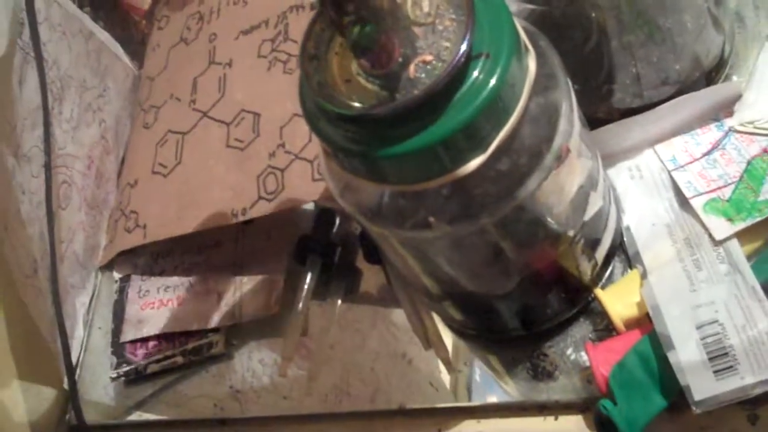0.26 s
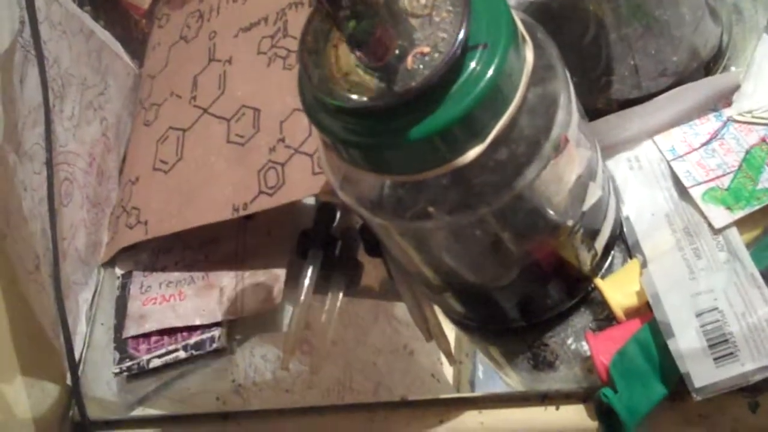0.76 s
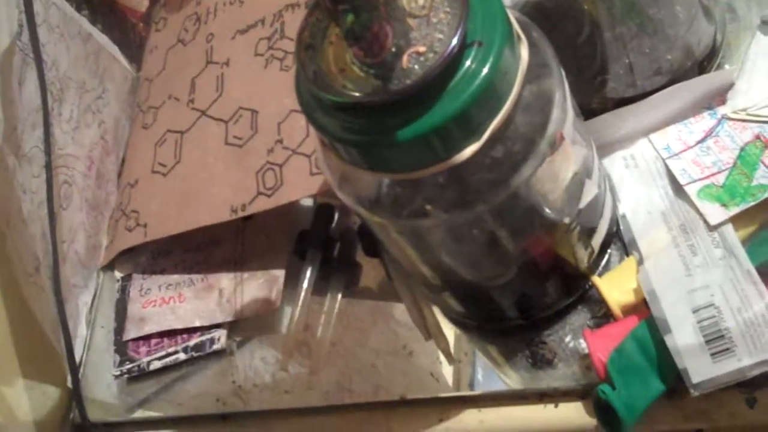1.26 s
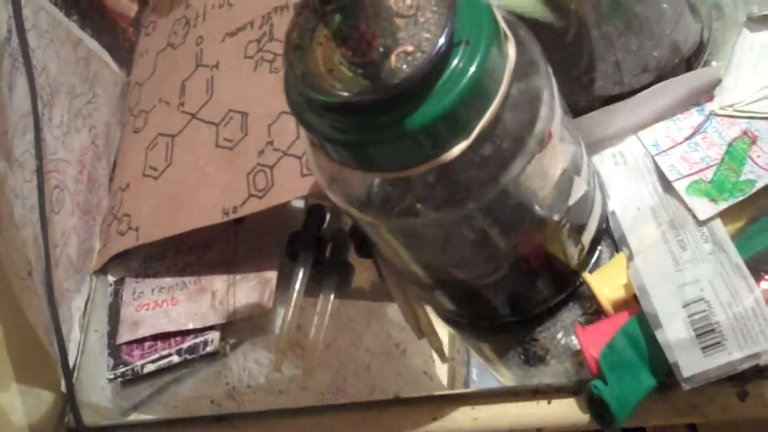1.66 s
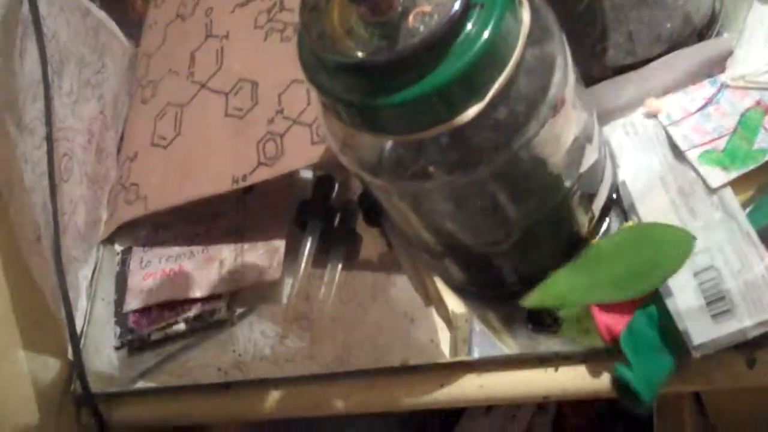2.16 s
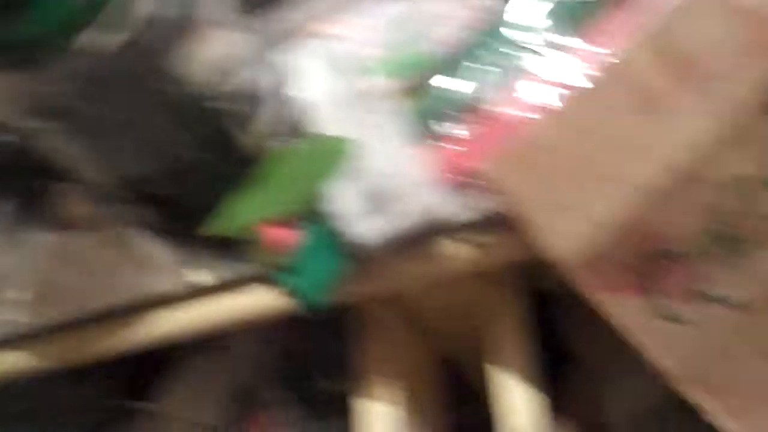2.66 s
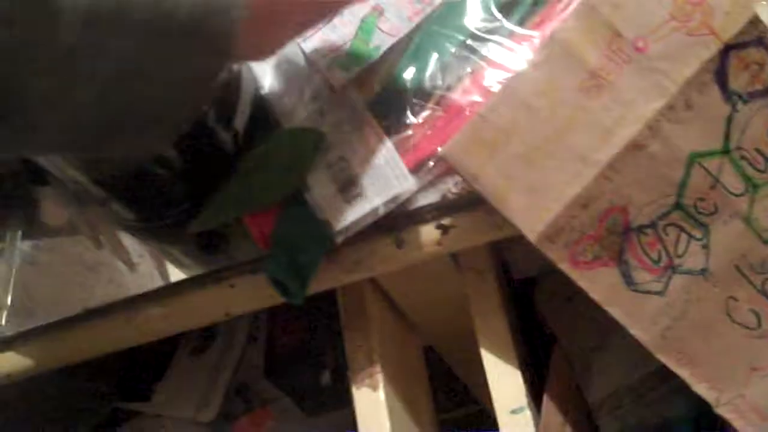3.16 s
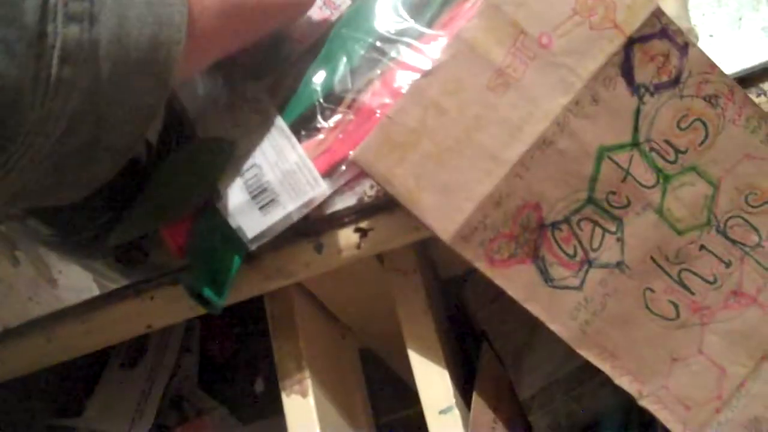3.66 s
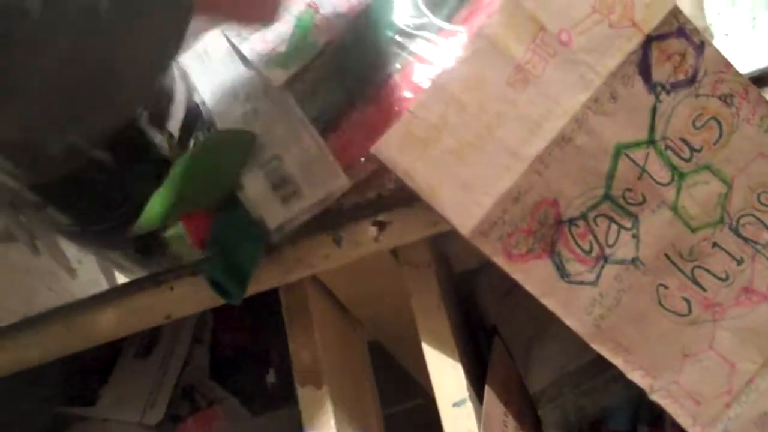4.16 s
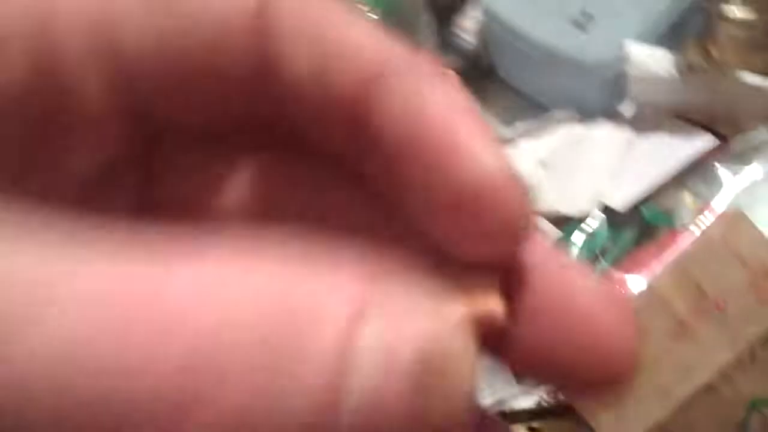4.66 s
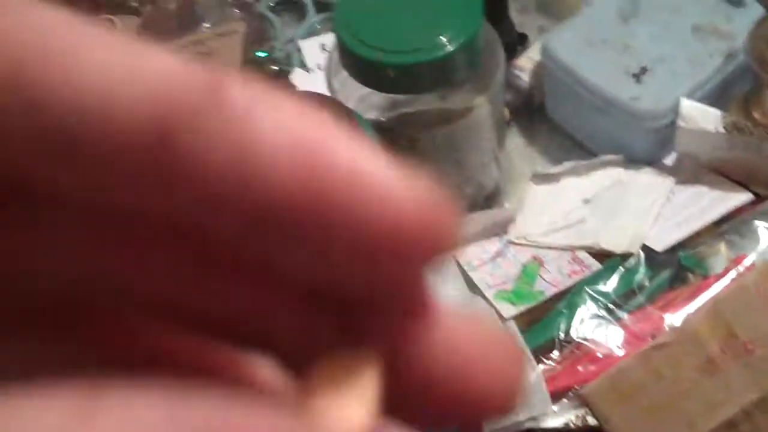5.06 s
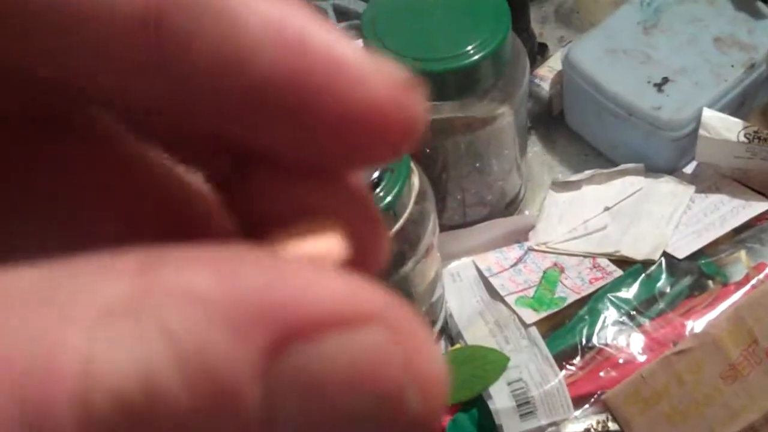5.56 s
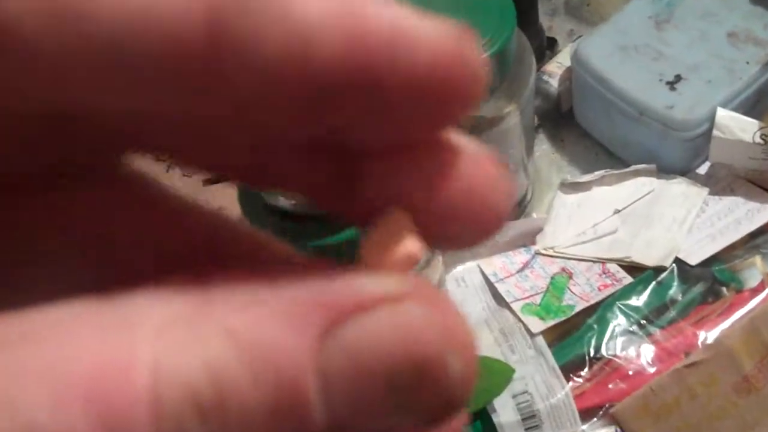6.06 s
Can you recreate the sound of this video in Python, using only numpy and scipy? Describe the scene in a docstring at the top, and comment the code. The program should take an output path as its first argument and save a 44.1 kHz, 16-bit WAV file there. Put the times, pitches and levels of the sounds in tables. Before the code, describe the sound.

Glass jars tink, knock together with a sharp ringing clink and rattle down on a table, followed by faint rustling and small ticks.

```python
"""A glass jar, moved by hand among others on a cluttered table, close to a stereo microphone in a small room.
It tinks, strikes two neighbours so that all three ring in their own modes, and is set down with a rattle
that makes the table top boom. Then paper and plastic rustle in tiny slips and snaps, and small things
tick between the fingers. Behind it all lie low room noise and a thin hiss."""
import sys
import numpy as np
from scipy import signal
from scipy.fft import rfft, irfft
from scipy.io import wavfile

SR = 44100
rng = np.random.default_rng(int(sys.argv[2]) if len(sys.argv) > 2 else 0)


def generate_wav(sig):
    """Save sig (samples, or channels by samples) to the path in sys.argv[1] as 16-bit PCM at SR."""
    pcm = np.round(np.clip(np.atleast_2d(sig).T, -1, 1) * 32767).astype(np.int16)
    wavfile.write(sys.argv[1], SR, pcm)


N = 278384

# decay of the small room: f/Hz, t60/s
ROOM_DECAY = [(150, .4), (350, 0.5), (1000, .35), (4000, 0.27), (8000, 0.11), (14000, 0.052)]
# spectra of the low room noise, the hiss and the band a cupped hand lifts: f/Hz, level/dB
MURMUR_SPECTRUM = [(20, -3.5), (60, -2), (130, -0.5), (330, -2), (600, -3.5), (1200, -7), (2500, -15),
                   (5000, -21), (14000, -40)]
HISS_SPECTRUM = [(500, -27), (2500, -8.5), (4400, -8.5), (5500, -6), (6500, -4.5), (7500, 2), (8400, -10.5),
                 (9600, -12.5), (11000, -14.5), (14000, -15.5), (14500, -41.5)]
CUPPED_SPECTRUM = [(4500, -67), (5800, -11), (6200, -4.5), (6600, -13), (8500, -18), (9600, -16),
                   (10500, -27)]
# the arm passing the microphone: middle t/s, half length/s, level/dB
ARM_SWISHES = [(3.056, 0.33, -60.5), (4.55, 0.23, -60)]
# how alike the two microphone ports hear background and rubbing: f/Hz, likeness (-1 to 1)
AIR_LIKENESS = [(60, -0.42), (150, -0.38), (360, -0.4), (900, -0.23), (2210, -0.01), (5450, -0.14),
                (13400, 0.11)]
RUB_LIKENESS = [(60, -0.26), (150, -0.11), (360, 0.1), (900, 1), (2210, 0.67), (5450, 0.59), (13400, 0.28)]
# to which side they lean: f/Hz, left minus right/dB
AIR_BALANCE = [(60, 0.5), (150, 3.5), (360, 5.0), (900, 4.5), (2210, 3.0), (5450, 2.52), (13400, 4.0)]
RUB_BALANCE = [(60, -2), (150, 2.5), (360, 3.0), (900, 0.5), (2210, 0.5), (5450, 0), (13400, 8.0)]

# spectrum of sliding and rustling: f/Hz, level/dB
RUB_SPECTRUM = [(47, -46), (80, -18), (190, -11), (469, -15.5), (723, -9.5), (822, -12.5), (999, -12.5),
                (2420, -12), (5610, -5), (7430, -0.5), (10700, -21), (13900, -22)]
# strokes of hand on paper and plastic, of dragged glass, of jar grazing jar: t/s, length/s, level/dB
RUSTLES = [(3.325, 0.062, -62.5), (3.33, 0.26, -49.5), (3.62, 0.092, -55), (3.675, 0.071, -56),
           (3.78, 0.1, -56.5), (3.945, 0.072, -57)]
SLIDES = [(1.655, 0.18, -57), (1.8215, .008, -30.5), (2.0, 0.013, -37), (2.03, 0.041, -57.5),
          (2.135, .025, -61)]
GRAZES = [(.808, 0.044, -44.5), (1.65, .13, -51)]
# bands of a contact's noise: low f/Hz, high f/Hz
KNOCK_BANDS = [(210, 480), (680, 1900), (2200, 4000), (4000, 6000), (6000, 8800), (8800, 14500)]
# timbre of each kind of contact: (level/dB in each band), t60/s
CRINKLE_TIMBRE = (-29, -18, -11.5, 0, 1.5, -17), 0.015
TICK_TIMBRE = (-26, -29.5, 0.5, 2, 1.6, -24.5), 0.02
TAP_TIMBRE = (-1.5, -3, -11, -18, -16, -30), .035
BASE_TIMBRE = (-13, -7, 0, 1, -3.5, -26.5), 0.041
CRACK_TIMBRE = (-25, -19, -6.5, -4, 0.5, -10.5), 0.013
# paper and plastic snapping, small hard things ticking: t/s, level/dB, tilt/(dB per band), ping f/Hz
CRINKLES = [(3.336, -48, -5, 4990), (3.354, -46.5, -3.5, 5470), (3.439, -44, -2, 6370),
            (3.4915, -37.5, 3, 5530), (3.557, -44.5, -3.6, 5430), (3.6335, -44.5, -1.5, 3700),
            (3.816, -45.5, -1.5, 3370), (3.830, -51, 4.5, 5700), (3.842, -45, -1.5, 6300),
            (4.128, -58.5, -7, 3563)]
TICKS = [(0.078, -67.5, 5.5, 7000), (0.31, -64, 3.5, 2070), (.691, -64.5, 1, 5530), (1.165, -64.5, 4, 7450),
         (2.232, -65, 5.2, 5270), (4.755, -65, -6.5, 2900), (5.039, -71, -8, 3200), (5.149, -55, 9, 6900),
         (5.169, -48, 3.8, 2750), (5.18, -47.5, -3.5, 7430), (5.192, -52.5, 6, 7760)]
# soft dull taps and a dull pop: t/s, level/dB, tilt/(dB per band), ping f/Hz
SOFT_TAPS = [(1.679, -63, -2, 518.6), (4.158, -65.5, -2.2, 950), (4.669, -68, -4, 310),
             (4.825, -65.5, -1, 700), (4.847, -62, -0.7, 866), (5.014, -70.5, 3, 2480),
             (5.367, -50.5, -.7, 715)]
# the jar's base knocking and rocking on the table: t/s, level/dB, tilt/(dB per band)
BASE_KNOCKS = [(1.886, -37.5, -2.5), (1.909, -51, -2), (2.01, -36, 0.5), (2.095, -49.5, -0.5),
               (2.122, -35, 1.1), (2.129, -44, -0.8), (2.137, -33, 2.5), (2.2823, -25.5, 0),
               (2.2959, -21, 1.7), (2.319, -50, 13.5), (2.384, -36, 3.5), (2.4372, -38, 3.3),
               (2.472, -45.5, -1), (2.491, -45, 1), (2.499, -56, -6.6), (2.534, -57.5, 3.5),
               (2.608, -59.5, 2.5), (2.641, -58.5, 4.5)]
# dull bumps, and chinks of the hardest glass contacts: t/s, level/dB, f/Hz, t60/s
BUMPS = [(.882, -55, 120, 0.36), (1.822, -34, 85.1, .03), (1.8233, -27.5, 171, .025),
         (1.886, -57, 127, 0.54), (2.296, -45, 110.6, 0.053), (3.385, -49.5, 205, 0.046),
         (4.669, -50, 101, 0.021), (5.368, -39.5, 204.5, .028)]
CHINKS = [(.8425, -29, 7790, 0.12), (1.2635, -25, 7820, 0.035), (1.719, -34.5, 3580, 0.012),
          (1.8222, 2.5, 8680, .022), (2.2967, -5.5, 4744, 0.021), (2.318, -15.5, 7080, 0.0095),
          (2.472, -33, 3640, 0.013)]
# modes of the table top: f/Hz, level/dB, t60/s
TABLE_MODES = [(206.5, -46, .25), (245, -39.5, 1), (298, -44, .45), (348.7, -38, 0.52),
               (383.1, -32.5, 0.11), (460, -40, .14)]
# blows that reach the table: t/s, level/dB, contact time/s
TABLE_BLOWS = [(1.823, -22, .001), (2.288, -8, .001), (2.298, -2, 0.0013)]

# modes of each jar: f/Hz, level/dB, t60/s, left minus right/dB
HELD_MODES = [(3021, -17.5, .55, 0), (5392, -15.5, .17, -2), (7520, -35, .12, 10), (7810, -24, .2, 12),
              (9948, -34, .15, 9), (10750, -41, .33, 14), (11170, -39, .2, 10), (12500, -38, .11, 9),
              (13600, -43, .13, 13)]
LIDDED_MODES = [(4757, -22, .46, -3), (4788, -30, .65, -2), (6404, -33, .55, 0), (6748, -24, .35, 3),
                (10663, -42, .55, 13), (11053, -27, .25, 9), (11250, -34, .36, 12)]
THIRD_MODES = [(3147, -19.5, .43, -6), (4183, -21, .5, 2), (4217, -16, .5, 8), (8570, -16, .2, 5),
               (8580, -8, .07, 4), (13847, -28, .15, 12)]
# blows on each jar: t/s, level/dB, tilt/(dB per octave)
HELD_BLOWS = [(0.8409, -16, -14), (0.848, -18, 14), (0.922, -36.5, 1), (0.989, -31.5, 4),
              (1.257, -22.5, -4), (1.2632, -22.5, 10.5), (1.324, -36, -6), (1.718, -31, 3),
              (1.784, -17.5, 1), (1.788, -12, -0.5), (1.8214, 2, 2), (3.973, -39, -7.5)]
LIDDED_BLOWS = [(1.735, -33, 4.5), (1.789, -3.5, 3), (1.8222, 2.5, -3.5), (2.283, -5, -8.5),
                (2.297, -22.5, -4.5), (2.384, -21, -2.5), (2.439, -26.5, 0)]
THIRD_BLOWS = [(1.8226, 1.2, .5)]
# how firmly the fingers hold the jar: t/s, grip (0 to 1)
GRIP = [(1.3, 1), (1.72, .1), (1.82, 0.02), (2.3, .95)]
GRIP_T60_S, GRIP_SHARPENS = .14, .004  # damping by a full grip, and the share it adds to the pitch
CHOKES, LIDDED_CHOKES = [2.13], [2.3, 2.545]  # a jar is pressed against something and stops ringing: t/s


def amp(db):
    """Decibels to gain."""
    return 10 ** (np.asarray(db) / 20)


def unit_rms(x):
    """Scales to rms 1."""
    return x / np.sqrt(np.mean(x ** 2) + 1e-20)


def decay(t, t60):
    """Falls by 60 dB in t60."""
    return np.exp(-np.log(1000) * t / t60)


def at_hz(points, hz):
    """Reads a curve on a log-frequency axis."""
    f, value = np.transpose(points)
    return np.interp(np.log(hz + 1), np.log(f + 1), value)


def panned(db):
    """Left and right gains, db apart."""
    return amp(np.array([[db], [-db]]) / 2)


def add(mix, s, sound):
    """Mixes a stereo sound in at time s."""
    part = mix[:, round(s * SR):][:, :sound.shape[1]]
    part += sound[:, :part.shape[1]]


def correlated(x, likeness):
    """Makes two unrelated channels partly alike."""
    c = np.clip(likeness, -1, 1)
    return np.array([x[0], c * x[0] + np.sqrt(1 - c * c) * x[1]])


def coloured(x, spectrum):
    """Gives a long sound a spectrum, at rms 1."""
    return unit_rms(irfft(rfft(x) * amp(at_hz(spectrum, np.fft.rfftfreq(N, 1 / SR))), N))


def at_ports(x, likeness, balance):
    """Makes two unrelated noises as alike and as lopsided as the microphone ports hear them."""
    hz = np.fft.rfftfreq(N, 1 / SR)
    sides = amp(np.outer([1, -1], at_hz(balance, hz)) / 2)
    return irfft(correlated(rfft(x), at_hz(likeness, hz)) * sides, N)


def room_tone(floor_db=-65.5, cupped_db=-66, cupped_from_s=4.42, cupped_rise_s=.25):
    """Low noise and hiss swell as the arm passes the microphone; a hand cupped near it lifts one band."""
    t = np.arange(N) / SR
    swish = sum(amp(db) * np.exp(-((t - middle) / half) ** 2) for middle, half, db in ARM_SWISHES)
    cupping = np.clip((t - cupped_from_s) / cupped_rise_s, 0, 1)
    murmur = coloured(rng.standard_normal((2, N)), MURMUR_SPECTRUM)
    murmur *= np.hypot(amp(floor_db), amp(-7) * swish)
    hiss = coloured(rng.standard_normal((2, N)), HISS_SPECTRUM) * np.hypot(amp(floor_db), swish)
    cupped = coloured(rng.standard_normal((2, N)), CUPPED_SPECTRUM) * amp(cupped_db) * cupping
    return at_ports(murmur + hiss + cupped, AIR_LIKENESS, AIR_BALANCE)


def room_reflections(x, build_s=.0043):
    """Dense reflections of the small room, each band dying at its own speed."""
    hz, t, noise = signal.stft(rng.standard_normal((2, SR)), SR, nperseg=256)
    tail = signal.istft(noise * decay(t, at_hz(ROOM_DECAY, hz)[:, None]), SR, nperseg=256)[1]
    tail = correlated(tail, .3) * (1 - np.exp(-np.arange(tail.shape[1]) / SR / build_s))
    return signal.fftconvolve(x, tail / np.linalg.norm(tail[0]), axes=1)[:, :N]


def strokes(rows, attack_s=.0073, sag_db_per_s=17, release_t60=.14):
    """Gain over time of rubbing strokes: each bites, eases off and lets go."""
    gain = np.zeros(N)
    for start, length, db in rows:
        t = np.maximum(np.arange(N) / SR - start, 0)
        release = decay(np.maximum(t - length, 0), release_t60)
        gain += amp(db - sag_db_per_s * t) * np.minimum(t / attack_s, 1) * release
    return gain


def friction(rows, slips_per_s, spread_db, smooth_db, slip_s=.00065):
    """Tiny slips and snaps of uneven size over a smooth rub."""
    slips = (rng.random(N) < slips_per_s / SR) * amp(spread_db * np.minimum(rng.exponential(1, N), 4))
    grain = signal.lfilter([1], [1, -np.exp(-1 / (slip_s * SR))], slips)
    rub = rng.standard_normal((2, N)) * (unit_rms(grain) + amp(smooth_db))
    return coloured(at_ports(rub, RUB_LIKENESS, RUB_BALANCE), RUB_SPECTRUM) * strokes(rows)


def knocks(rows, timbre, treble_pan_db, span_s=.0063):
    """Hard contacts: crowded, heavily damped modes as bands of noise, the lowest dying last."""
    out, t = np.zeros((2, N)), np.arange(4096) / SR
    filters = [signal.butter(3, band, "band", fs=SR, output="sos") for band in KNOCK_BANDS]
    bands_db, t60 = timbre
    t60s = [1.6 * t60] + 5 * [t60]
    likeness = [.9, .9, .1, .042, .053, .17]
    pans_db = [1, 1, 0, 1, treble_pan_db, 2 * treble_pan_db]
    span_gain = np.sqrt(span_s / t[-1])  # level counts as if the whole burst fell within span_s
    for s, db, tilt_db, *_ in rows:
        tilted_db = bands_db + tilt_db * (np.arange(len(filters)) - 3)
        for sos, band_db, band_t60, alike, pan_db in zip(filters, tilted_db, t60s, likeness, pans_db):
            noise = correlated(rng.standard_normal((2, len(t))), alike)
            burst = unit_rms(signal.sosfilt(sos, noise * decay(t, band_t60)))
            add(out, s, amp(db + band_db) * panned(pan_db) * burst * span_gain)
    return out


def pings(rows, pan_db, rise_cycles=.6, port_delay_s=.00002):
    """Single damped swings, a little earlier at the left port: high ones chink, low ones bump."""
    out, t = np.zeros((2, N)), np.arange(SR // 4) / SR
    port_t = np.maximum(t - np.array([[0], [port_delay_s]]), 0)
    for s, db, hz, t60 in rows:
        swing = np.sin(2 * np.pi * hz * port_t) * (1 - np.exp(-t * hz / rise_cycles))
        add(out, s, amp(db) * panned(pan_db) * swing * decay(t, t60))
    return out


def snaps(rows, timbre, ping_db, ping_t60, pan_db, treble_pan_db=6.5):
    """Small snaps, taps and pops: a dry burst and a brief ping."""
    rings = [(s, db + ping_db, hz, ping_t60) for s, db, _, hz in rows]
    return knocks(rows, timbre, treble_pan_db) + pings(rings, pan_db)


def ticks(rebound_s=.008, rebound_db=-8):
    """Each small hard thing clicks and springs back once."""
    rebounds = [(s + rebound_s, db + rebound_db, tilt_db, hz) for s, db, tilt_db, hz in TICKS]
    return snaps(TICKS + rebounds, TICK_TIMBRE, ping_db=16.5, ping_t60=.013, pan_db=-2)


def table_boom(low_cut_hz=190):
    """The table top booms; a long contact cannot drive its higher modes, and it radiates little bass."""
    out, t = np.zeros((2, N)), np.arange(SR) / SR
    for s, db, contact_s in TABLE_BLOWS:
        boom = sum(amp(mode_db) * np.sin(2 * np.pi * hz * t) * decay(t, t60) / (1 + (hz * contact_s) ** 2)
                   for hz, mode_db, t60 in TABLE_MODES)
        add(out, s, amp(db) * panned(1) * boom)
    return signal.sosfilt(signal.butter(4, low_cut_hz, "high", fs=SR, output="sos"), out)


def glass_cracks(blows, gain_db):
    """Glass meeting glass gives a dry crack in proportion to the blow."""
    return knocks([(s, db + gain_db, 0) for s, db, _ in blows], CRACK_TIMBRE, treble_pan_db=7.5)


def glass_graze(tilt_db=-4):
    """Glass rubbing on glass feeds the held jar's modes with noise, so that it sings softly."""
    ring = jar_ring(HELD_MODES, [(.0066, 0, tilt_db)], chokes=[], held=True)[:, :SR // 2]
    rub = rng.standard_normal((1, N)) * strokes(GRAZES)
    return signal.oaconvolve(rub, ring / np.linalg.norm(ring[0]), axes=1)[:, :N]


def waver(t, depth_db=2.5, rates_hz=(6, 18)):
    """Gain of one partial of a moving jar: it starts at 1, then swells and dips at random."""
    rates = np.geomspace(*rates_hz, num=4)[:, None]
    drift = np.sin(2 * np.pi * (rates * t + rng.random(rates.shape))).sum(0) / np.sqrt(2)
    return amp(depth_db * drift * np.minimum(t * rates[-1], 1))


def jar_ring(modes, blows, chokes, held=False, port_lag_rad=1.1, rise_s=.0005, choke_t60=.2):
    """Each blow starts all modes of a jar; fingers on the glass damp the ring and sharpen it a little."""
    out, t = np.zeros((2, N)), np.arange(SR * 2 // 3) / SR
    # each mode reaches the two ports out of step
    lags = port_lag_rad * rng.choice([-1, 1], (len(modes), 1, 1)) * np.array([[0], [1]])
    fades = [decay(t, t60) * waver(t) for _, _, t60, _ in modes]
    for s, db, tilt_db in blows:
        grip = held * np.interp(s, *np.transpose(GRIP))
        sharpen = 1 + GRIP_SHARPENS * grip
        until_choke_s = min([c - s for c in chokes if c > s] + [1])
        choke = decay(np.maximum(t - until_choke_s, 0), choke_t60)
        envelope = (1 - np.exp(-t / rise_s)) * decay(grip * t, GRIP_T60_S) * choke
        for (hz, mode_db, _, pan_db), lag, fade in zip(modes, lags, fades):
            ring = np.sin(2 * np.pi * (hz * sharpen * t + rng.random()) + lag) * fade
            gain = amp(db + mode_db + tilt_db * np.log2(hz / 5000))
            add(out, s, gain * panned(pan_db) * ring * envelope)
    return out


def scene():
    """Glass, dry contacts, rubbing and the table top close up, with the room faint around them."""
    glass = (jar_ring(HELD_MODES, HELD_BLOWS, CHOKES, held=True, port_lag_rad=1.3)
             + jar_ring(LIDDED_MODES, LIDDED_BLOWS, LIDDED_CHOKES, port_lag_rad=1.5)
             + jar_ring(THIRD_MODES, THIRD_BLOWS, CHOKES)
             + glass_graze())
    contacts = (glass_cracks(HELD_BLOWS, gain_db=-20.5) + glass_cracks(THIRD_BLOWS, gain_db=-13)
                + pings(CHINKS, pan_db=3.5)
                + knocks(BASE_KNOCKS, BASE_TIMBRE, treble_pan_db=4)
                + ticks()
                + snaps(SOFT_TAPS, TAP_TIMBRE, ping_db=13, ping_t60=.035, pan_db=0, treble_pan_db=3)
                + snaps(CRINKLES, CRINKLE_TIMBRE, ping_db=10.5, ping_t60=.01, pan_db=-5.5))
    rubs = (friction(SLIDES, slips_per_s=700, spread_db=4.5, smooth_db=-3)
            + amp(2) * friction(RUSTLES, slips_per_s=740, spread_db=3, smooth_db=3.5))
    boom = table_boom()
    bumps = pings(BUMPS, pan_db=.5, rise_cycles=.08)
    into_room = amp(-20) * glass + amp(-15) * contacts + amp(-11.5) * rubs + amp(-9.5) * boom
    return glass + contacts + rubs + boom + bumps + room_reflections(into_room) + room_tone()


def record(dry):
    """The loudest clink overloads the microphone input; then the treble is cut above 14.4 kHz."""
    low_pass = signal.firwin(255, 14400, window=("kaiser", 8), fs=SR)
    return signal.oaconvolve(np.clip(dry, -1, 1), low_pass[None], "same")


dry = scene()
out = record(dry)
generate_wav(out)
```